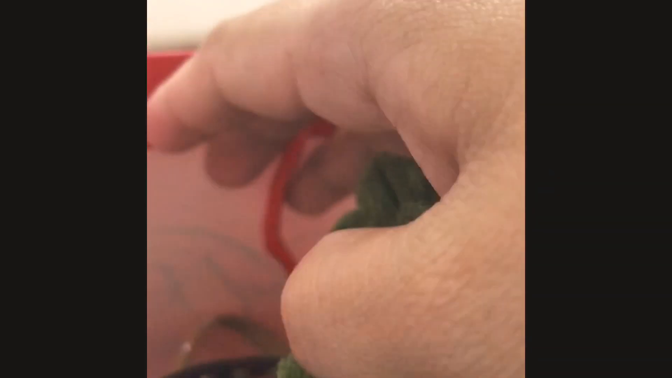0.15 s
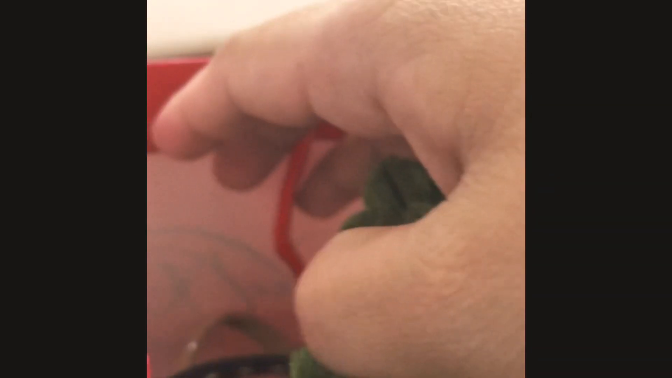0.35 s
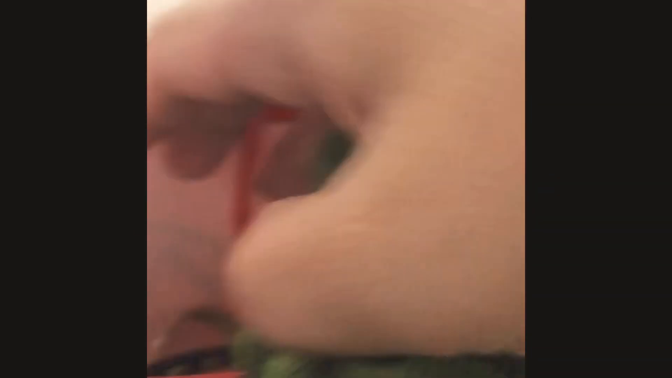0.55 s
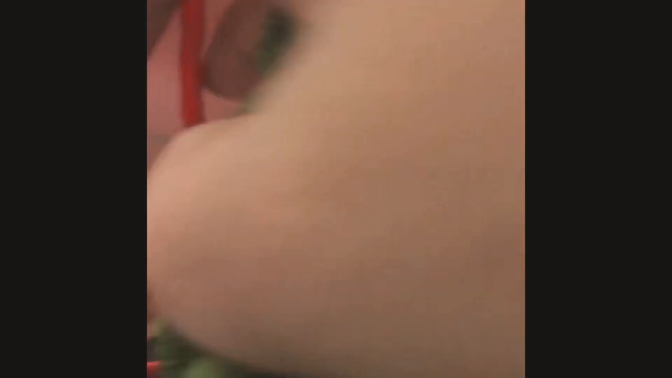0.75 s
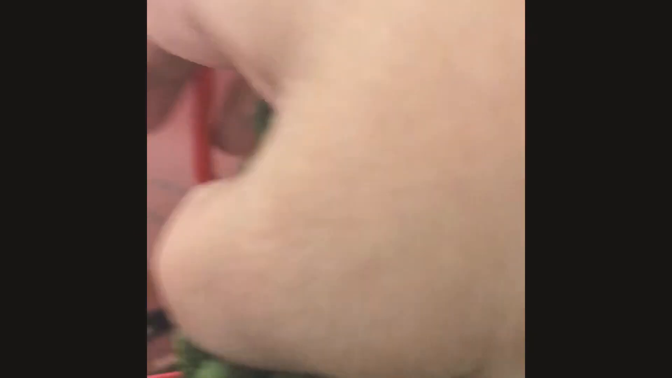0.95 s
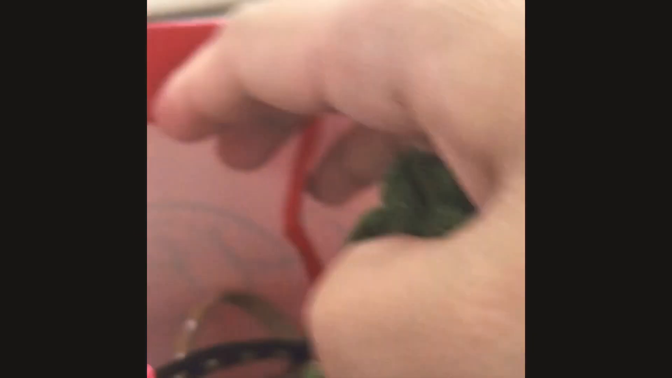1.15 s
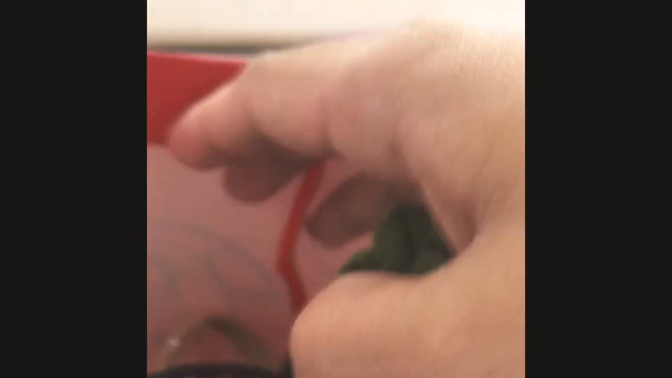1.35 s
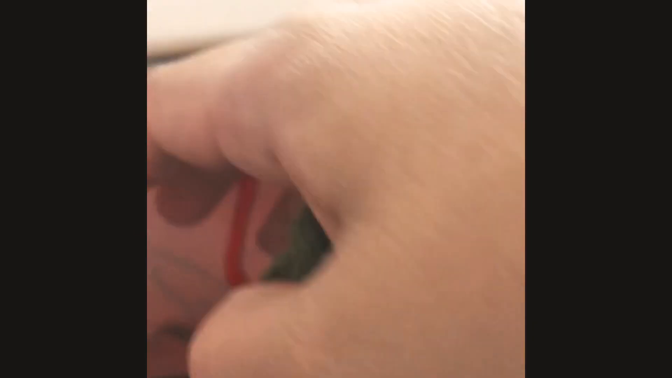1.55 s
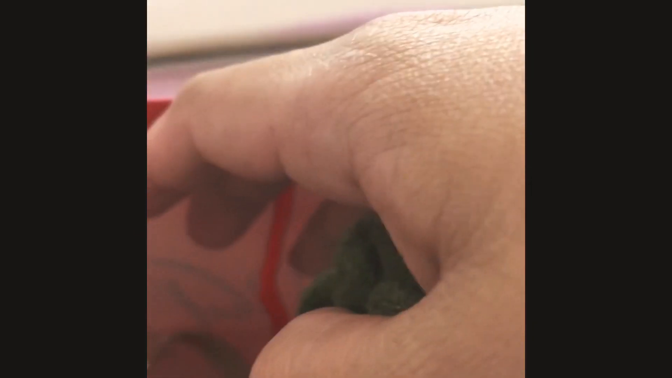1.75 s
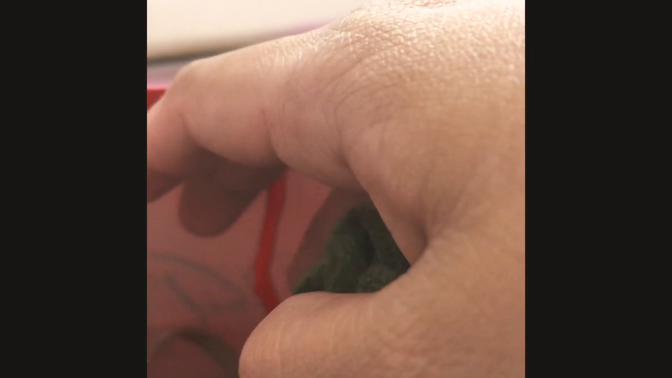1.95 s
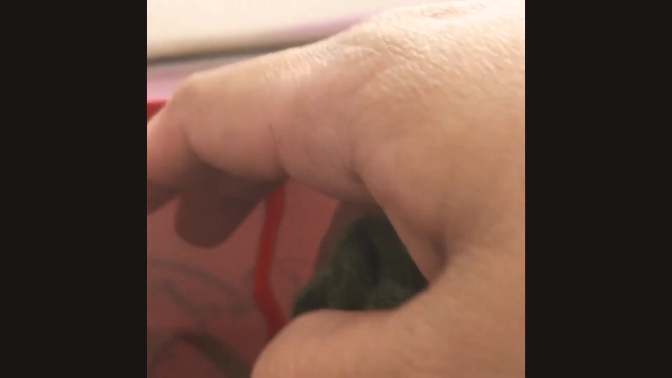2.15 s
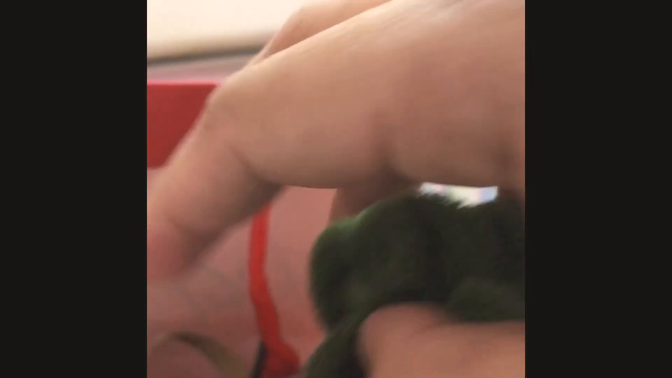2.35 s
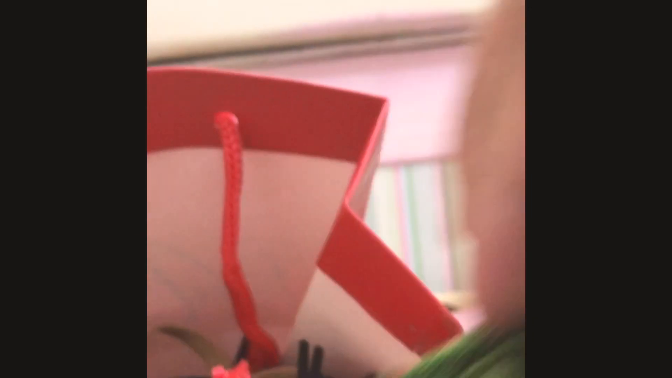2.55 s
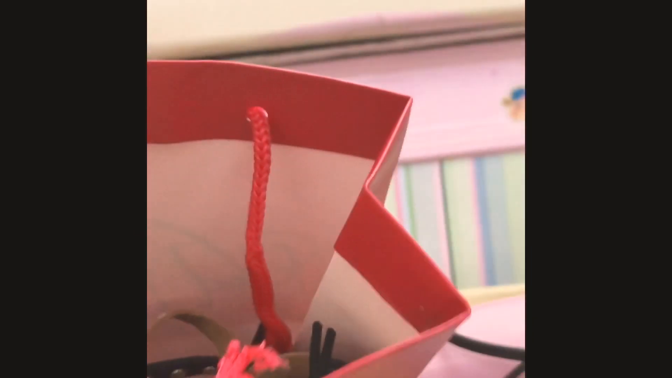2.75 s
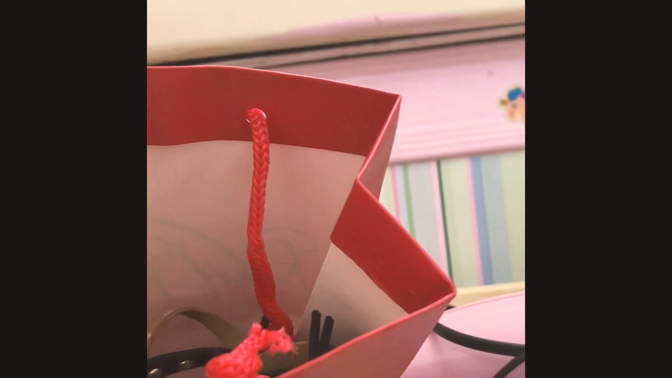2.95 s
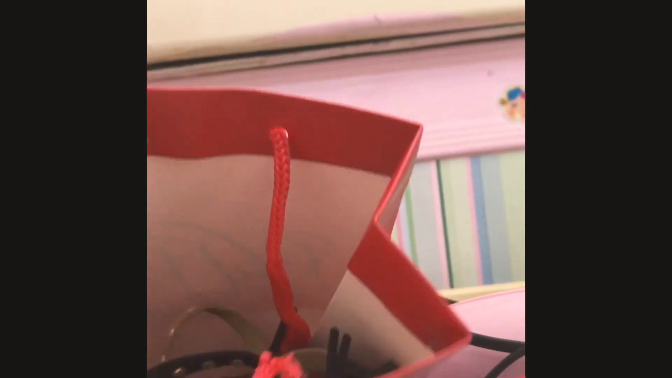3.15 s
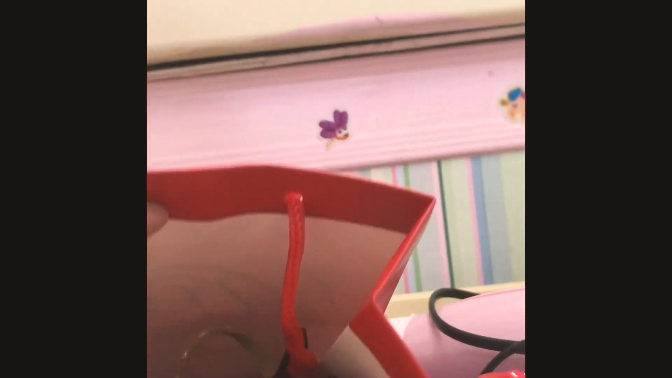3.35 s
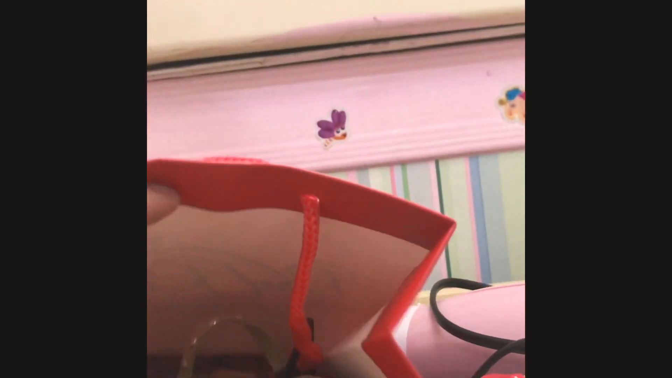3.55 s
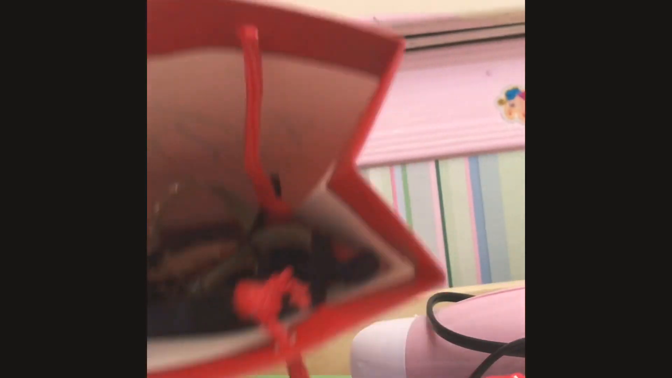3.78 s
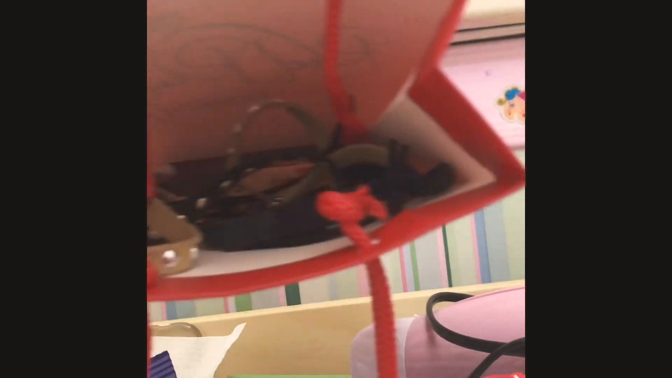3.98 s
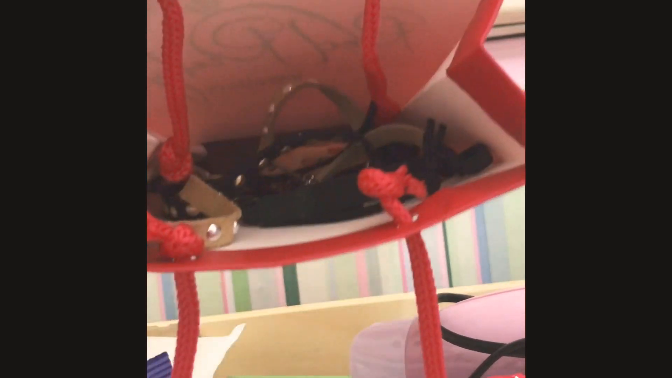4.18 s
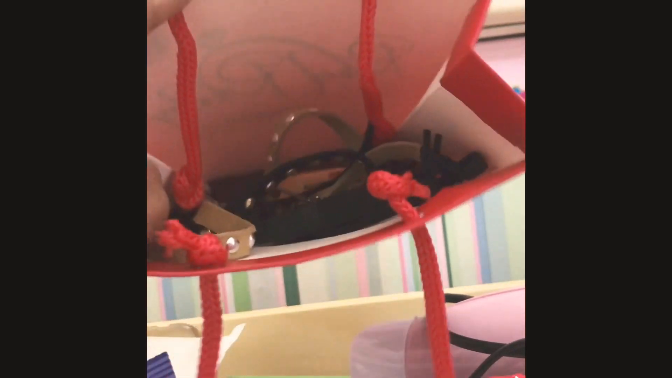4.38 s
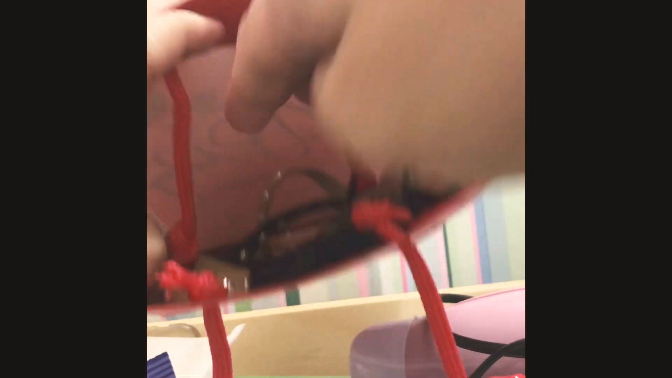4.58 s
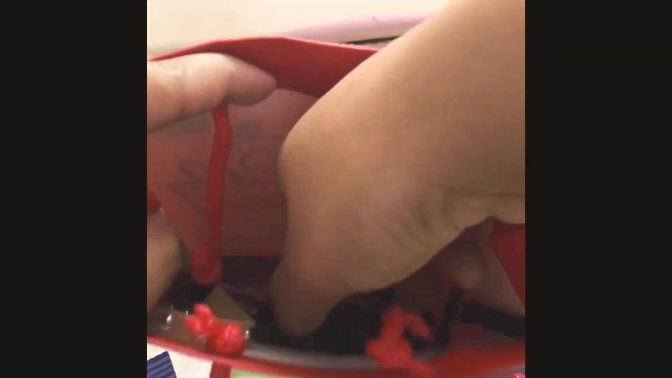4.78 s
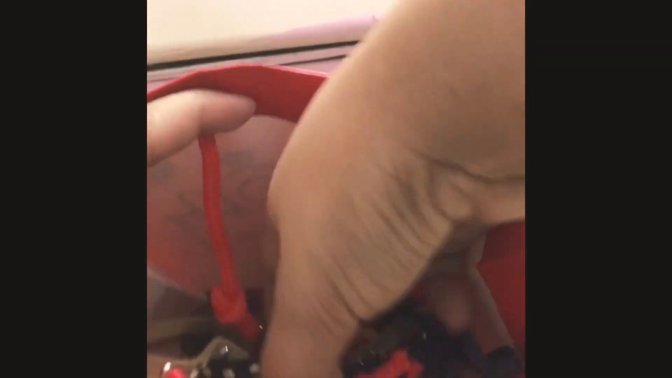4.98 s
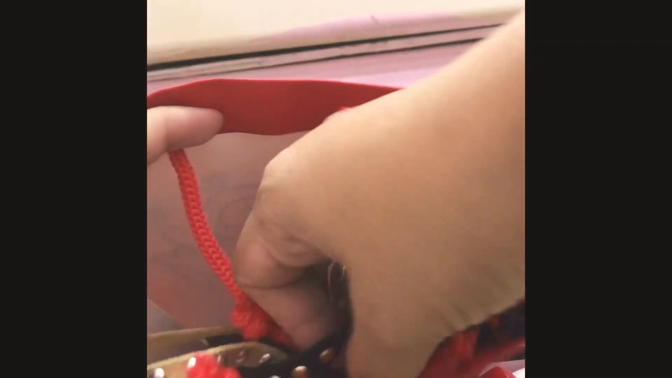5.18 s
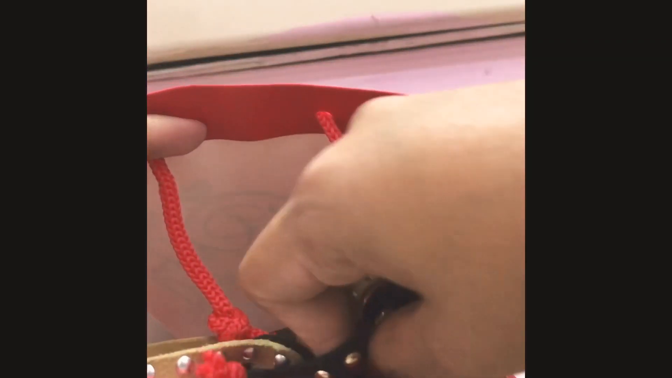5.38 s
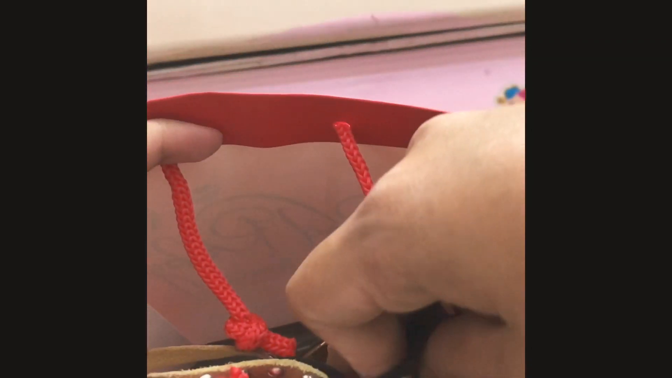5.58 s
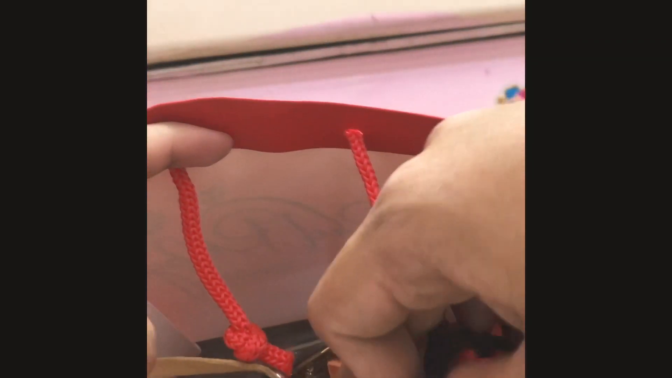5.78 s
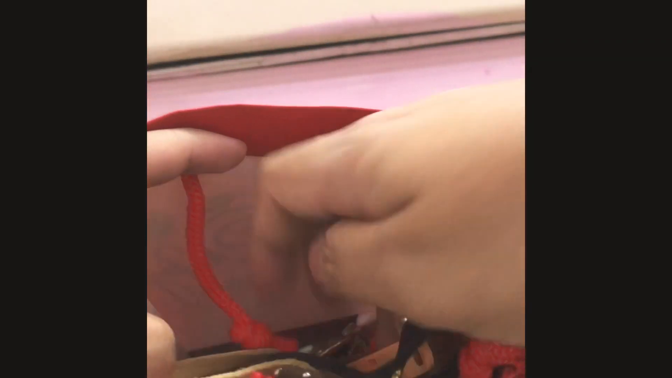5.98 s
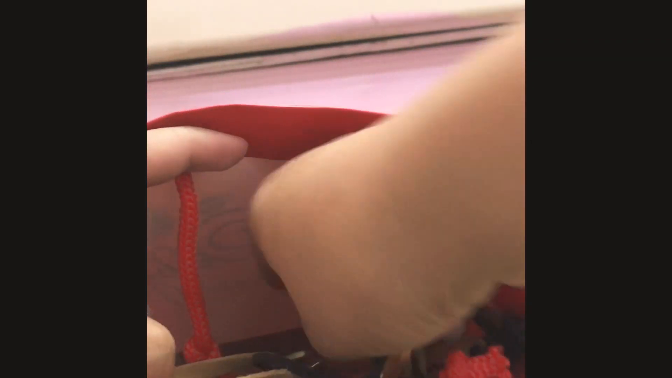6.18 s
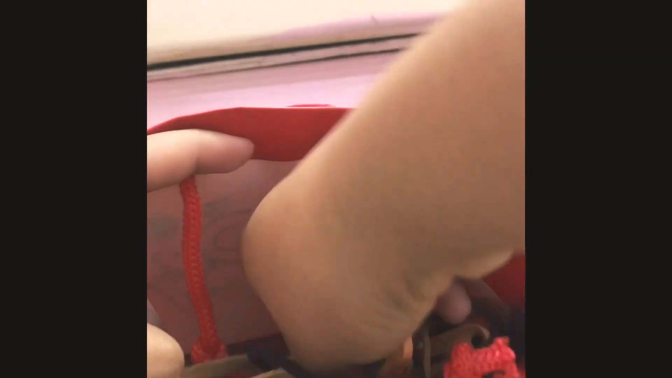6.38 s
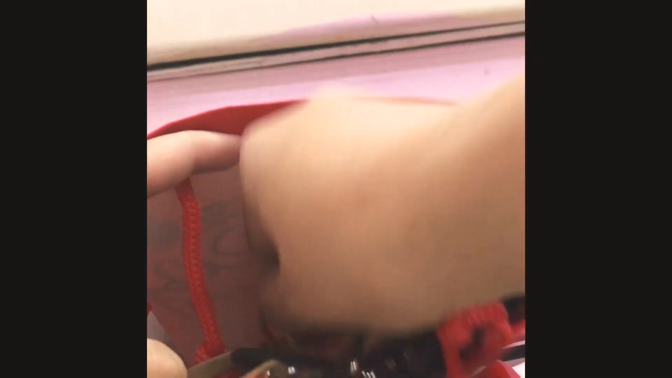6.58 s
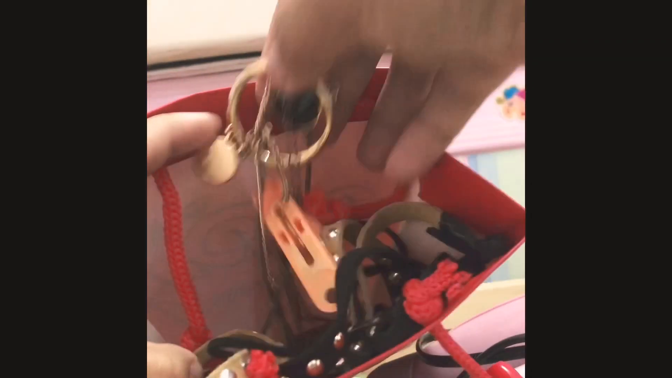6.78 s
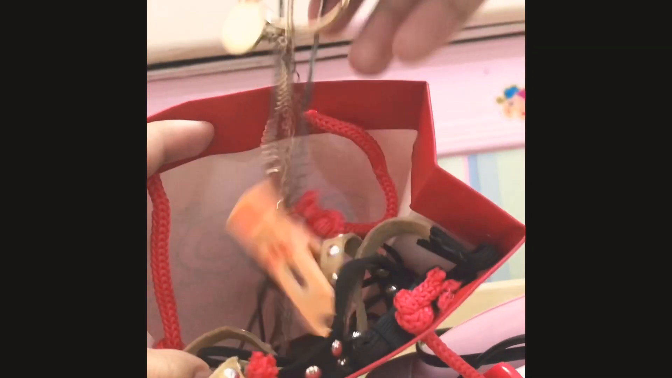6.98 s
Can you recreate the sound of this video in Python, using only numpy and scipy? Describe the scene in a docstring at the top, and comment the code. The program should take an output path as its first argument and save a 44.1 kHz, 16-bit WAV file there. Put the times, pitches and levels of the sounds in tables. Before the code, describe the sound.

A hand rummages in a stiff paper gift bag with dull knocks, crinkles and rustles, then plastic clips click and metal trinkets clink.

```python
"""Dull knocks come first, as a hand bumps around in a stiff paper gift bag, close by in a small room.
The card walls snap and crinkle, skin and cloth slide over the paper, and the air in the bag rings.
Later, plastic hair clips click together, and near the end metal trinkets clink as they are pulled out."""
import sys
import numpy as np
from scipy import signal
from scipy.fft import rfft, irfft, next_fast_len
from scipy.io import wavfile
from scipy.ndimage import map_coordinates

SR = 44100
rng = np.random.default_rng(int(sys.argv[2]) if len(sys.argv) > 2 else 0)


def pcm_store(signal):
    """Save signal as 16-bit PCM."""
    levels = np.round(np.clip(np.atleast_2d(signal), -1, 1) * 32767)
    wavfile.write(sys.argv[1], SR, levels.astype(np.int16).T)


N = 310023


def amp(db):
    return 10 ** (np.asarray(db) / 20)


def unit(x):
    return x / np.sqrt(np.mean(x ** 2) + 1e-20)


def burst(x):
    """Scale a short sound to the energy of one millisecond at an average (rms) level of 1."""
    return x * np.sqrt(SR / 1000 / np.sum(x ** 2))


def along(points, hz):
    """Read between (Hz, value) points, giving each octave about equal space."""
    freqs, values = np.transpose(points)
    return np.interp(np.log(hz + 1), np.log(freqs), values)


def wobble(rate):
    """A smooth curve through `rate` random points a second."""
    return map_coordinates(rng.standard_normal(int(N * rate / SR) + 4), [np.arange(N) * rate / SR])


def filtered(x, response):
    """Scale and delay each frequency of x as response(hz) says."""
    size = next_fast_len(N + SR // 2)
    return irfft(rfft(x, size) * response(np.fft.rfftfreq(size, 1 / SR)), size)[:N]


def add(track, start, sound):
    """Mix a sound in at `start` seconds."""
    i = max(0, round(start * SR))
    track[i:i + len(sound)] += sound[:len(track) - i]


def lowpass(hz, edge_hz):
    """Turn down the treble above the edge."""
    return 1 / (1 + 1j * hz / edge_hz - (hz / edge_hz) ** 2)


def highpass(hz, edge_hz):
    """Turn down the bass below the edge."""
    return (hz / edge_hz) ** 2 * lowpass(hz, edge_hz)


# The tone of the background. Each row: frequency in Hz, relative level in dB.
BACKGROUND_TONE = [(20, -25.5), (90, 1.5), (300, 1), (1000, -10), (4000, -28.5), (16000, -35)]


def background():
    """The quiet room: a steady, low rush of noise."""
    return unit(filtered(rng.standard_normal(N), lambda hz: amp(along(BACKGROUND_TONE, hz))))


# The room's echo. Each row: frequency in Hz, seconds to fade by 60 dB (called t60).
ROOM_FADE = [(150, 0.23), (1500, 0.32), (6000, 0.27), (15000, 0.097)]


def room(x):
    """A small furnished room adds a short echo whose treble dies first."""
    hz, t, spectrum = signal.stft(rng.standard_normal(SR // 2), SR, nperseg=256)
    tail = signal.istft(spectrum * amp(-60 * t / along(ROOM_FADE, hz)[:, None]), SR, nperseg=256)[1]
    return signal.fftconvolve(x, np.pad(tail, (SR // 250, 0)) / np.linalg.norm(tail))[:N]


# The notes of the air in the bag. Each row: pitch in Hz, width in Hz, relative level in dB.
BAG_AIR_NOTES = [(303, 43, 1.5), (491, 56, -1.5), (637, 72, -2.5), (1082, 220, -5), (1513, 480, -11),
                 (3450, 2000, -8)]


def hollow(hz):
    """The direct sound plus the air ringing inside the bag."""
    return 1 + sum(amp(db) * 1j * hz * width / (centre ** 2 - hz ** 2 + 1j * hz * width)
                   for centre, width, db in BAG_AIR_NOTES)


def bending(hz, travel):
    """Ripples in card carry treble faster than bass; a larger `travel` spreads them further apart."""
    return np.exp(-2j * np.pi * travel * (2 * np.sqrt(1000 * hz) - hz / 5))


def tap(db, low_hz, high_hz, travel, echo=0.73, crumple_db=-13, crumple_t60=0.055, ring_db=-5):
    """A blow runs through the card as a falling chirp, returns from the folds and stirs the fibres."""
    t = np.arange(SR // 5) / SR
    hz = np.fft.rfftfreq(len(t), 1 / SR)
    bag = (1 + amp(ring_db) * (hollow(hz) - 1)) * highpass(hz, 61.1)
    path = travel * np.exp(0.041 * rng.standard_normal())
    folds = sum(echo / k * rng.choice([-1, 1]) * bending(hz, path * (1 + k * rng.uniform(0.791, 1.6)))
                for k in range(1, 4))
    fibres = rng.standard_normal(len(t)) * amp(-60 * t / crumple_t60)
    crumple = amp(crumple_db) * rfft(fibres) / np.linalg.norm(fibres)
    wave = bending(hz, path) * (1 + crumple) + folds
    return amp(db) * burst(irfft(wave * highpass(hz, low_hz) * lowpass(hz, high_hz) * bag, len(t)))


# A finger drags on the card. Each row: time of the loudest moment in seconds, length in seconds,
# pitch in Hz, width in Hz, level in dB.
FINGER_DRAGS = [(0.183, 0.069, 328, 60, -59), (1.546, 0.12, 7400, 1500, -56), (2.623, 0.13, 4120, 900, -52),
                (2.688, 0.12, 509, 30, -49), (3.31, 0.23, 3230, 910, -47.5), (5.167, 0.037, 990, 149, -38),
                (5.736, 0.1, 2560, 400, -53)]


def drags():
    """A finger sticks and slips at a loosely held rate, making a rasp that swells and fades."""
    out, t = np.zeros(N), np.arange(N) / SR
    for middle, length, pitch_hz, width_hz, db in FINGER_DRAGS:
        rasp = filtered(rng.standard_normal(N), lambda hz: 1 / (1 + ((hz - pitch_hz) / width_hz * 2) ** 2))
        out += amp(db) * unit(rasp) * np.cos(np.pi * np.clip((t - middle) / length, -.5, .5))
    return out


def crinkles(rubbing_db, per_second=17, above_db=10, scatter_db=3, pitch_hz=790, scatter_octaves=1.79):
    """Small creases give way at random, louder when the rubbing that bends them is louder."""
    out = np.zeros(N)
    reach = 2 ** (1.24 / 2)  # each crinkle is 1.24 octaves wide
    for when, size, pitch in rng.random((int(per_second * N / SR), 3)):
        hz = pitch_hz * 2 ** (scatter_octaves * (2 * pitch - 1))
        db = rubbing_db[int(when * N)] + above_db + scatter_db * (2 * size - 1)
        add(out, when * N / SR, tap(db, hz / reach, hz * reach, travel=.0016))
    return out


# The notes of a hair clip. Each row: pitch in Hz, relative level in dB.
CLIP_NOTES = [(1650, -7.5), (2930, -1), (4000, -9), (5300, -6)]
# The clips knock together. Each row: start in seconds, level in dB.
CLIP_HITS = [(3.17, -33), (4.69, -22.5), (5.9014, -21.5), (6.524, -27.5)]


def hair_clips(t60=0.015):
    """Hard plastic rings for only a few milliseconds."""
    out, t = np.zeros(N), np.arange(SR // 10) / SR
    ring = sum(amp(level - 60 * t / t60) * np.sin(2 * np.pi * hz * t) for hz, level in CLIP_NOTES)
    for start, db in CLIP_HITS:
        add(out, start, amp(db) * burst(ring))
    return out


# The notes of a trinket. Each row: pitch in Hz, relative level in dB, seconds to fade by 60 dB.
TRINKET_NOTES = [(6940, -10, 0.035), (9500, 2.5, 0.021), (9900, -3, 0.02), (10860, -4, 0.024),
                 (10940, -3, 0.026), (12800, -1.5, 0.05), (13900, -21, .05), (15122, -6, 0.077)]
# The trinkets touch. Each row: start in seconds, level in dB.
TRINKET_HITS = [(6.327, -34.5), (6.383, -34), (6.406, -34), (6.456, -23), (6.462, -32), (6.476, -29),
                (6.504, -36), (6.648, -16.5), (6.6595, -28), (6.865, -20), (6.878, -32)]


def trinkets(tick_db=1, tick_t60=0.0077, jingle_db=-35, jingle_count=28):
    """Metal ticks and rings a little differently at each touch, over a faint, lower jingle of chain."""
    out, t = np.zeros(N), np.arange(SR // 5) / SR
    clinks = [(start, db, 1) for start, db in TRINKET_HITS]
    jingle = [(rng.uniform(6.35, 7), jingle_db + rng.normal(0, 2.2), rng.uniform(0.28, 1))
              for _ in range(jingle_count)]
    for start, db, pitch_ratio in clinks + jingle:
        ring = np.zeros(len(t))
        for hz, level, t60 in TRINKET_NOTES:
            fade = amp(level + rng.normal(0, 4.1) - 60 * t / t60)
            note_hz = pitch_ratio * hz * rng.normal(1, 0.0055)
            ring += fade * np.sin(2 * np.pi * (note_hz * t + rng.random()))
        tick = amp(tick_db - 60 * t / tick_t60) * np.diff(rng.standard_normal(len(t) + 1))
        add(out, start, amp(db) * burst(ring + tick))
    return out


# Light contact that never stops. Each row: time in seconds, level in dB.
LIGHT_CONTACT = [(0, -74), (0.45, -76), (0.72, -71.5), (1.1, -68), (1.65, -61), (2.4, -56), (3.55, -55.5),
                 (4.15, -67.5), (4.65, -55.5), (5.0, -43), (5.65, -55.5), (5.98, -58.5), (6.5, -52),
                 (7.03, -56)]
# The hand slides over the card. Each row: start in seconds, length in seconds, seconds to rise the
# last 20 dB before the start, then level, swell, weight of the touch and wall flutter, all in dB.
HAND_STROKES = [(0.166, 0.03, 0.063, -56, 0, 3.5, -76), (0.329, 0.048, 0.022, -61.5, 1, 11, -51),
                (0.486, 0.077, 0.065, -69, -0.5, 11, -55), (0.598, 0.032, 0.03, -41.5, -9, 4.5, -50),
                (0.837, 0.027, .1, -53.5, -4.5, 1, -51), (1.167, 0.048, 0.012, -48, -4, 8.5, -58),
                (1.255, .07, 0.11, -53, 5.5, 1.5, -51), (1.34, 0.086, .02, -44.5, 3.5, -0.5, -58),
                (1.506, 0.092, .03, -48.5, -5.5, 8, -49), (1.723, 0.23, 0.0089, -43.5, -15, -3, -56),
                (1.97, 0.16, 0.089, -54, -5.5, -11.5, -83), (2.228, 0.036, 0.073, -45, -2, -8, -63),
                (2.321, 0.17, 0.091, -51, -2.5, -2, -52), (2.714, 0.062, 0.18, -49.5, 1, -2, -55.5),
                (2.914, 0.28, 0.059, -55.5, -1, 1.5, -78), (3.248, .2, 0.094, -54, 7, -1, -67),
                (3.624, 0.095, 0.079, -52.5, -4.5, -0.5, -64), (3.827, 0.21, 0.3, -63, -1, -15, -78),
                (4.494, 0.059, 0.13, -50.5, -3.5, -5, -59), (4.685, 0.24, .01, -45, 8, -0.5, -56),
                (4.967, 0.15, 0.069, -34, -6, -5.5, -46), (5.16, 0.26, .05, -48.5, 4, 3, -62),
                (5.468, 0.16, 0.055, -53, -5, 7, -74), (5.712, 0.063, 0.032, -50.5, -4, 0, -55),
                (5.869, 0.066, 0.086, -55, -1.5, -1.5, -69), (6.017, 0.25, .008, -52.5, 5.5, 0.5, -67),
                (6.356, 0.042, 0.055, -43, -1, 5, -60), (6.459, 0.081, 0.023, -44.5, -3.5, 5.5, -70),
                (6.621, 0.18, 0.076, -40.5, -1.5, -2, -63), (6.826, 0.25, 0.042, -45.5, 1, -1.5, -62)]


def touch(release_db_per_s=399, contact_weight_db=0.5, contact_flutter_db=-11):
    """The sliding hand's level, weight and wall flutter in dB: strokes rise, swell or fade, and let go."""
    t = np.arange(N) / SR
    power = amp(np.interp(t, *np.transpose(LIGHT_CONTACT))) ** 2
    weighted = power * contact_weight_db
    flutter = power * amp(contact_flutter_db) ** 2
    for start, length, rise, db, swell_db, weight_db, flutter_db in HAND_STROKES:
        attack = 20 * np.minimum(t - start, 0) / rise
        swell = swell_db * np.clip((t - start) / length, 0, 1)
        release = release_db_per_s * np.maximum(t - start - length, 0)
        shape = amp(attack + swell - release) ** 2
        stroke = amp(db) ** 2 * shape
        power += stroke
        weighted += stroke * weight_db  # louder strokes count for more in the average weight
        flutter += amp(flutter_db) ** 2 * shape
    return 10 * np.log10(power), weighted / power, 10 * np.log10(flutter)


def friction(tone, per_second, spread_db, hiss_db, uneven_db=2):
    """Tiny slips of scattered size and a smooth sliding hiss spread through the card."""
    sizes = amp(spread_db * np.clip(rng.standard_normal(N), -2, 2)) * rng.choice([-1, 1], N)
    slips = unit(sizes * (rng.random(N) < per_second / SR))
    drive = slips + amp(hiss_db) * rng.standard_normal(N)
    sound = filtered(drive, lambda hz: amp(along(tone, hz)) * bending(hz, 0.001982) * hollow(hz))
    return unit(sound) * amp(uneven_db * wobble(55))


def between_walls(x, strength=0.12, count=10):
    """Short echoes between hand and walls come and go as the hand moves, shifting the tone."""
    delays = rng.uniform(.0004, .005, count)
    echoes = sum(wobble(9) * np.pad(x, (round(delay * SR), 0))[:N] for delay in delays)
    return (x + strength * echoes) / np.sqrt(1 + count * strength ** 2)


# The four tones of rubbing, from low to high. Each row: frequency in Hz, relative level in dB.
FLUTTER_TONE = [(20, -47), (45, -13.5), (80, -6.5), (180, -4.5), (250, -8), (400, -23.5), (900, -68)]
BODY_TONE = [(100, -29.5), (200, 1), (290, -1), (520, -2), (800, -2.5), (1250, -3), (1650, -7),
             (2600, -16.5), (6000, -62)]
SCRAPE_TONE = [(600, -43), (1300, -8), (1700, -4), (2200, -1), (3300, -2), (5500, -2.5), (7000, -10.5),
               (12000, -48.5)]
FIZZ_TONE = [(3000, -25), (5200, -8), (6500, 0.5), (9000, -1.5), (12000, -3.5), (15500, -4.5), (17000, -28)]


def rubbing(level_db, weight_db, flutter_db):
    """Walls flutter and the grain scrapes; a heavy touch brings out the card's body and dulls the fizz."""
    flutter = friction(FLUTTER_TONE, per_second=90, spread_db=3, hiss_db=-3.5)
    body = friction(BODY_TONE, per_second=200, spread_db=2.5, hiss_db=1)
    scrape = friction(SCRAPE_TONE, per_second=140, spread_db=6, hiss_db=5.5)
    fizz = friction(FIZZ_TONE, per_second=260, spread_db=8, hiss_db=6.5, uneven_db=3)
    return between_walls(amp(flutter_db - 0.5) * flutter
                         + amp(level_db + weight_db - 1.8) * body
                         + amp(level_db - 1.63) * scrape
                         + amp(level_db - 0.45 * weight_db - 3.5) * fizz)


# A crease snaps or an item raps the card. Each row: start in seconds, knock level in dB,
# pitch in Hz, width in octaves, crack level in dB.
CARD_SNAPS = [(0.26, -46.5, 700, 2.4, -75), (0.3232, -38.5, 1200, 1.3, -63), (0.488, -37, 500, 4.1, -70),
              (0.531, -35, 700, 3, -66), (0.5827, -10.5, 1650, 1.3, -39), (0.5855, -7.5, 1000, 2.7, -44),
              (0.5872, -28, 7950, 0.87, -15.5), (0.893, -40.5, 1880, 1, -75),
              (0.951, -47.5, 1500, 1.8, -48.5), (1.162, -31.5, 840, 3.4, -51),
              (1.34, -22.5, 1800, 1.4, -50), (1.3447, -20.5, 1400, .6, -51), (1.476, -29.5, 1290, 1.1, -60),
              (1.973, -41, 4000, 3, -37), (2.336, -37, 1000, 2.4, -26.5), (2.394, -29.5, 920, 2.1, -49),
              (2.58, -34, 600, 5.2, -56), (2.754, -33, 1100, 2.1, -39), (2.85, -31.5, 560, 2.6, -51),
              (2.864, -28, 1590, 2.3, -38), (3.17, -28.5, 1400, 4.7, -50), (3.207, -34.5, 1200, 2, -57),
              (3.256, -28.5, 1140, 1, -57), (3.3398, -15, 1520, 0.15, -19), (3.483, -30, 705, 2.5, -72),
              (3.527, -32.5, 1000, 4.5, -43), (3.649, -28.5, 545, 3.6, -35.5), (3.719, -35, 4900, .5, -52),
              (4.349, -45, 890, 2.4, -48.5), (4.689, -26, 1100, 3.8, -28), (4.751, -21, 556, 2.1, -32),
              (4.873, -23.5, 1410, 2.5, -33), (4.92, -28, 900, 1.4, -25.5), (4.945, -23, 5200, .8, -44),
              (5.103, -24.5, 1870, 2.3, -44), (5.343, -30, 4400, 1.2, -23.5),
              (5.356, -24.5, 2900, 3.1, -42), (5.375, -21, 654, 3.5, -19), (5.488, -25, 550, 2.8, -55),
              (5.9026, -27, 1740, 3.2, -23.5), (6.006, -29.5, 4470, .2, -35),
              (6.239, -28.5, 380, 0.87, -30), (6.273, -42, 1600, .5, -52), (6.3, -27, 450, 0.73, -46),
              (6.354, -30, 1210, 4.4, -43), (6.382, -27, 1400, 5.2, -43), (6.389, -26, 840, 0.74, -26.5),
              (6.485, -25, 2100, 2.2, -44), (6.521, -23, 3100, .2, -29)]


def snaps(crack_t60=.006):
    """The card knocks around the snap's pitch, topped by a dry crack."""
    out, t = np.zeros(N), np.arange(SR // 5) / SR
    hz = np.fft.rfftfreq(len(t), 1 / SR)
    for start, db, pitch_hz, octaves, crack_db in CARD_SNAPS:
        reach = 2 ** (octaves / 2)
        knock = tap(db, pitch_hz / reach, pitch_hz * reach,
                    travel=.0018, echo=0.67, crumple_db=-12, ring_db=2.5)
        noise = rng.standard_normal(len(t)) * amp(-60 * t / crack_t60)
        crack = irfft(rfft(noise) * highpass(hz, 3500), len(t))
        add(out, start, knock + amp(crack_db) * burst(crack))
    return out


# The hand bumps a wall of the bag. Each row: start in seconds, knock level in dB,
# treble edge in Hz (higher is a harder touch), level of the soft push in dB.
HAND_BUMPS = [(0.0031, -13.5, 840, -23), (0.324, -24.5, 505, -17), (0.353, -29.5, 380, -26),
              (0.432, -40, 130, -36), (0.5864, -3, 640, -21), (0.6094, -6.5, 554, -21),
              (0.831, -27.5, 402, -29.5), (1.076, -42, 301, -57), (1.127, -35.5, 483, -46),
              (1.261, -32, 400, -48), (1.341, -12, 530, -14), (1.436, -27, 630, -29),
              (1.476, -21, 560, -26), (1.505, -29.5, 282, -28), (1.607, -41, 200, -33.5),
              (1.796, -34.5, 370, -38), (2.238, -34, 200, -35), (2.261, -35, 460, -36),
              (2.335, -33.5, 500, -31.5), (2.534, -31, 263, -27.5), (4.085, -40, 300, -54),
              (4.6908, -21.5, 990, -31), (4.865, -22.5, 600, -36), (4.921, -27, 700, -38),
              (5.069, -30.5, 360, -41), (6.113, -30, 280, -54)]


def bumps(push_delay_s=0.0045):
    """A dull knock on the wall, then a soft, deep push as the wall sways after the blow."""
    out = np.zeros(N)
    for start, db, edge_hz, push_db in HAND_BUMPS:
        add(out, start, tap(db, low_hz=125, high_hz=edge_hz, travel=.002, echo=0.49, ring_db=-3.5))
        add(out, start + push_delay_s, tap(push_db, low_hz=62, high_hz=190, travel=.0017, echo=.3))
    return out


def scene():
    """The bag close by, a trace of the room's echo and its quiet background."""
    level_db, weight_db, flutter_db = touch()
    quiet = amp(-65.5) * background()
    bag = bumps() + snaps() + rubbing(level_db, weight_db, flutter_db) + drags()
    bag += hair_clips() + trinkets() + crinkles(level_db)
    return (bag + amp(-33.5) * room(bag) + quiet)[None]


def record(dry, bass_hz=48, top_hz=16100):
    """The microphone loses the deepest bass and the very highest treble."""
    return filtered(dry[0], lambda hz: highpass(hz, bass_hz) / np.sqrt(1 + (hz / top_hz) ** 160))[None]


dry = scene()
out = record(dry)
pcm_store(out)
```